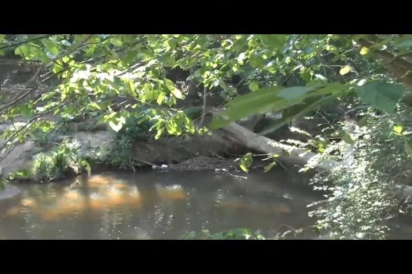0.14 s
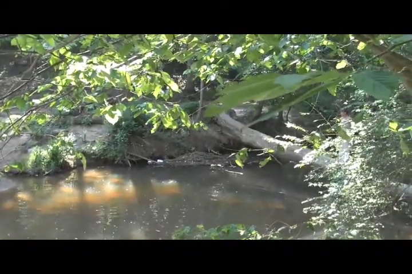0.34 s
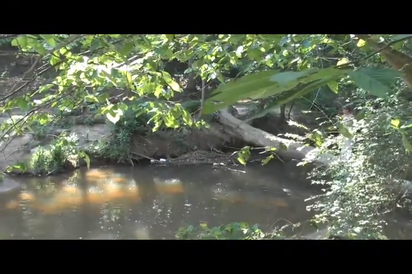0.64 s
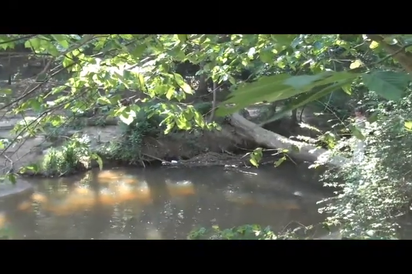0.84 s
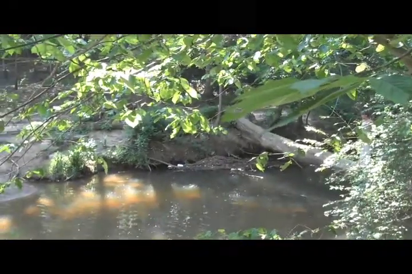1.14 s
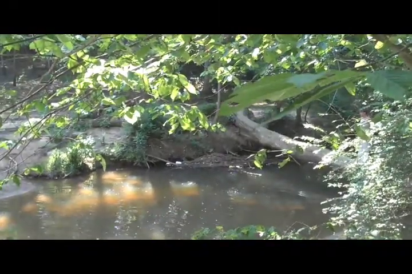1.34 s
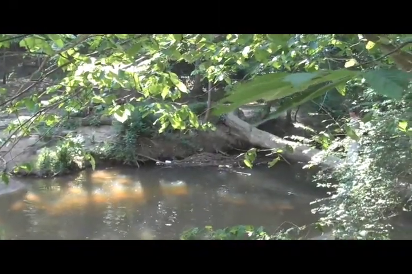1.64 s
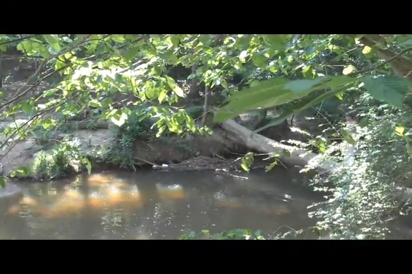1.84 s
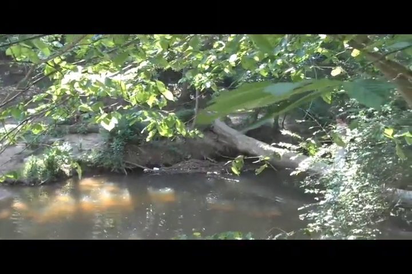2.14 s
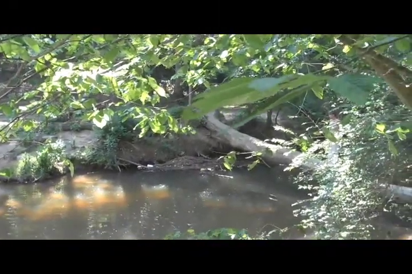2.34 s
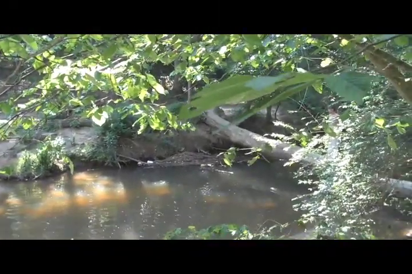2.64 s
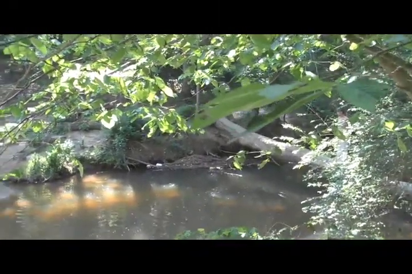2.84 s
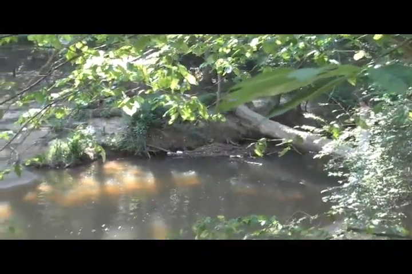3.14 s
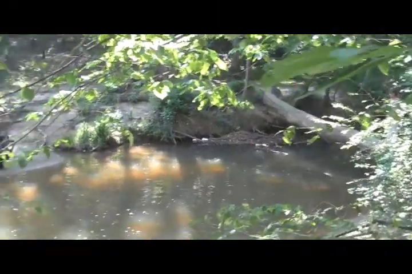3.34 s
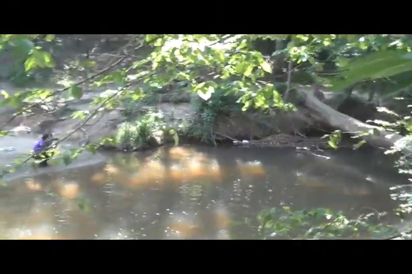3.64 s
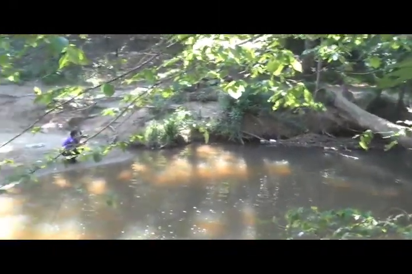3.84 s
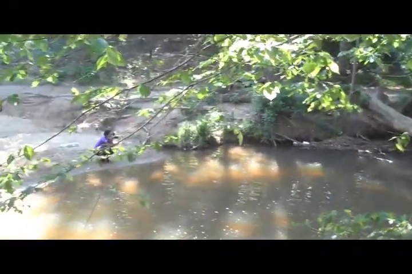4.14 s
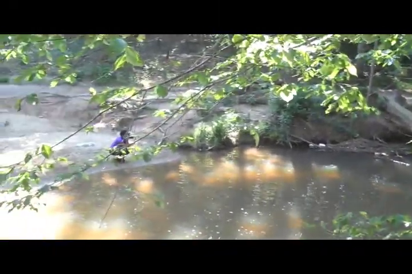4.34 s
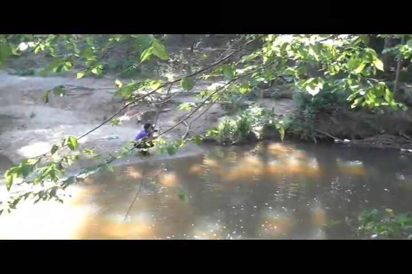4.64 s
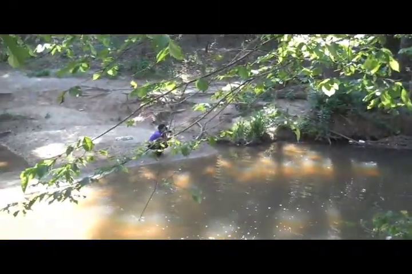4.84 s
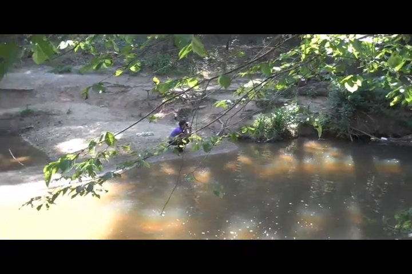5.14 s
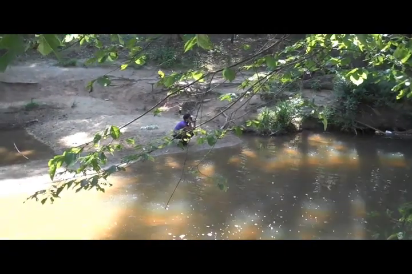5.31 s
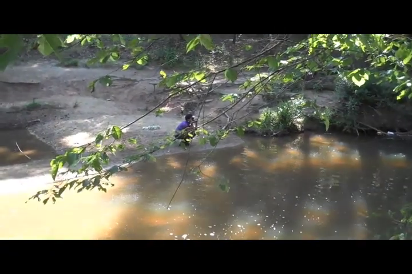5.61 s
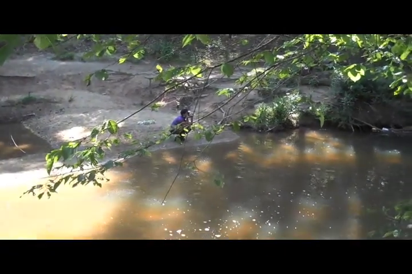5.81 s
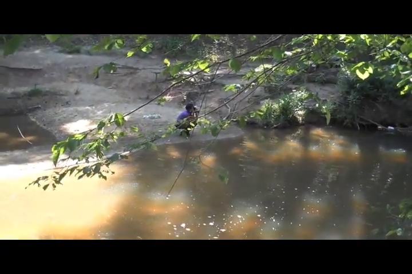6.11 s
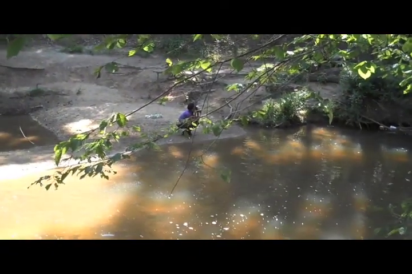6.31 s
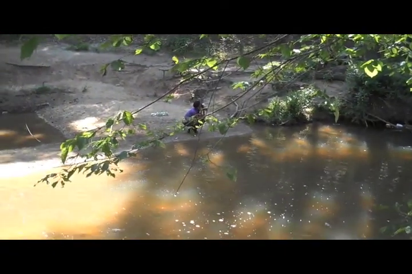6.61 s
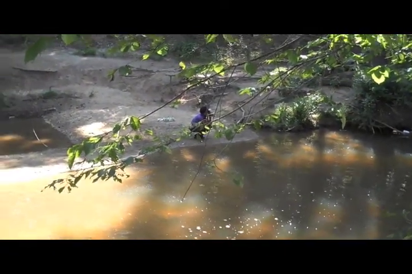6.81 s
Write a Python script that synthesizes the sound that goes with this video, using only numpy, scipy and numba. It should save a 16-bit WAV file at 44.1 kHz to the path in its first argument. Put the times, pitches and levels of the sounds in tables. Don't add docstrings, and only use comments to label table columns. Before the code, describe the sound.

For about seven seconds a creek tumbles over a low weir, heard from some metres away outdoors. The sound is a continuous, dense rush of froth and spray, bright in the middle and upper range, thin in the bass and with the very highest treble cut off. It starts even; a high bubble blip shows near 0.7 s and lower plips around 1 s. The water swells slightly at 1.8 s with a few bubbling notes, then eases back until about 3 s. A high plip comes at 3.3 s, and the rush grows a little towards 3.9 s, with two close, low glugs at 4.0 s. Further small bubbles stand out near 4.6, 5.2, 6.0 and 6.4 s. Another slight rise comes at 5.1 s, followed by a brief dip, and the flow ends a little stronger and brighter, without stopping. The image is nearly mono, with tiny flickers of treble width.

```python
import sys
import numpy as np
from scipy import signal
from scipy.fft import rfft, irfft
from scipy.io import wavfile
from scipy.ndimage import uniform_filter1d
from numba import njit

SR = 44100
rng = np.random.default_rng(int(sys.argv[2]) if len(sys.argv) > 2 else 0)


def voltage_ratio(decibels):
    exponent = np.asarray(decibels, float) / 20
    return 10 ** exponent


def transcribe(u):
    v = np.clip(np.atleast_2d(u).T, -1, 1)
    q = np.round(v * 32767).astype(np.int16)
    wavfile.write(sys.argv[1], SR, q)


N = 307377
FROTH_LOW_HZ, FROTH_TOP_HZ = 200, 8000
FRAME, GRID = 1024, 715


def shaped(x, gain):
    freq_hz = np.arange(len(x) // 2 + 1) * SR / len(x)
    return irfft(rfft(x) * gain(freq_hz), len(x))


def unit(x):
    return x / np.sqrt(np.mean(x ** 2))


def walk(rate_hz):
    hold = int(SR / rate_hz)
    levels = np.repeat(rng.standard_normal(N // hold + 1), hold)
    return 2.0 * uniform_filter1d(uniform_filter1d(levels, hold), hold)[:N]


@njit
def ring(start, hz, cycles, size, glide):
    out = np.zeros(N)
    for k in range(len(hz)):
        span = cycles[k] * SR / hz[k]
        step = np.exp(1j * 2 * np.pi * hz[k] / SR)
        bend = np.exp(1j * 2 * np.pi * hz[k] / SR * glide[k] / span)
        fade, fast = np.exp(-3 / span), np.exp(-9 / span)
        z, body, onset = 1 + 0j, size[k], size[k]
        for i in range(int(start[k]), min(N, int(start[k] + 2 * span))):
            out[i] += (body - onset) * z.imag
            z, step = z * step, step * bend
            body, onset = body * fade, onset * fast
    return out


def in_froth(f):
    return (f > FROTH_LOW_HZ) * (f < FROTH_TOP_HZ)


def froth(count, cycles, scatter_db, glide):
    when, pitch, luck = rng.random((count, 3)).T
    pitch_hz = 150 + 8500 * pitch ** 1.6
    size = voltage_ratio(-scatter_db * np.log(1 - luck))
    cloud = ring(when * N, pitch_hz, cycles * np.ones(count), size, glide * np.ones(count))
    power = uniform_filter1d(np.abs(rfft(cloud)) ** 2, size=1500)
    return unit(shaped(cloud, lambda f: in_froth(f) / np.sqrt(power + 1e-9)))


def weir(bubble_share, surge_db, flicker_db):
    # freq_hz, density_db
    rush_colour = [(20, -31), (35, -32.5), (90, -36), (130, -30), (200, -18.5), (327, -9), (520, -8.5),
                   (749, -2.5), (1160, -1), (2800, -.5), (4500, -3), (7000, -6.5), (9300, -8),
                   (13700, -8.5)]
    # time_s, level_db
    flow_curve = [(0, -38), (.8, -37.7), (1.65, -37.8), (1.85, -36.5), (2.15, -37.5), (2.55, -38),
                  (3.1, -37.5), (3.6, -37), (3.9, -36), (4.15, -36.5), (4.45, -37), (4.9, -36.8),
                  (5.12, -36), (5.3, -37.5), (5.8, -37), (6.2, -36.5), (6.6, -37), (6.97, -36)]
    region_hz = [450, 2000, 5600, 10500]
    swell_share = [.1, 0.78, .5, 0.39]
    turn_db_per_s = [-.05, 0.042, 0.079, 0.13]

    bubbles = np.sqrt(bubble_share) * froth(count=50000, cycles=42.8, scatter_db=1.5, glide=0.051)
    froth_power = bubble_share * SR / 2 / FROTH_TOP_HZ
    spray = shaped(rng.standard_normal(N), lambda f: np.sqrt(1 - froth_power * in_froth(f)))
    colour_hz, colour_db = np.transpose(rush_colour)
    rush = shaped(bubbles + spray, lambda f: voltage_ratio(np.interp(np.log(f + 1), np.log(colour_hz), colour_db)))
    rush = rush / np.std(shaped(rush, lambda f: (f > 900) * (f < 4000)))

    t = np.arange(N) / SR
    flow_db = np.interp(t, *np.transpose(flow_curve))
    mean_db = flow_db.mean()
    surge = surge_db * walk(9.9)
    out = 0
    for own, follow, turn in zip(np.eye(len(swell_share)), swell_share, turn_db_per_s):
        band = shaped(rush, lambda f: np.interp(np.log(f + 1), np.log(region_hz), own))
        swell_db = mean_db + follow * (flow_db - mean_db) + turn * (t - t.mean())
        out = out + band * voltage_ratio(swell_db + surge + flicker_db * walk(18))
    return out


def glugs():
    # start_s, pitch_hz, level_db, length_cycles, glide_share
    pockets = [(.68, 4300, -37, 40, .03), (0.978, 447, -47, 13, 0.11), (1.05, 1560, -37, 34, .05),
               (1.699, 1720, -39, 24, .05), (1.898, 1160, -41, 20, 0.092), (1.952, 1040, -40.5, 44, .05),
               (3.299, 3270, -38, 35, .03), (4.005, 722, -42, 20, .03), (4.025, 736, -38.5, 32, .02),
               (4.6, 1340, -40, 35, .05), (5.17, 2750, -35, 30, .03), (6.04, 633, -46, 21, .05),
               (6.4, 7750, -42, 60, .02)]
    start_s, pitch_hz, level_db, cycles, glide = np.array(pockets, float).T
    return ring(start_s * SR, pitch_hz, cycles, 3.5 * voltage_ratio(level_db), glide)


def scene():
    mono = weir(bubble_share=0.099, surge_db=0.09, flicker_db=0.21) + glugs()
    return np.tile(mono, (2, 1))


def frame_lines(low_hz, high_hz):
    line = np.arange(round(low_hz * 2 * FRAME / SR), round(high_hz * 2 * FRAME / SR))[:, None]
    window = signal.windows.kaiser_bessel_derived(2 * FRAME, 4 * np.pi)
    phase = np.pi / FRAME * (np.arange(2 * FRAME) + .5 + FRAME / 2) * (line + .5)
    return np.sqrt(2 / FRAME) * window * np.cos(phase)


def starve_top(mono, step_db):
    out, lines = mono.copy(), frame_lines(13780, 14300)
    for start in range(GRID, len(mono) - 2 * FRAME, FRAME):
        old = lines @ mono[start:start + 2 * FRAME]
        new = np.round(old / voltage_ratio(step_db)) * voltage_ratio(step_db)
        out[start:start + 2 * FRAME] += (new - old) @ lines
    return out


def widen(mono, patch_db):
    # start_s, then low_hz of each patch
    patches = [(0.109, 4630), (0.55, 5190), (0.759, 9250), (0.782, 5160), (0.852, 8950, 13130),
               (0.875, 4150, 11020, 12610), (0.968, 10600), (1.247, 4150, 8240),
               (1.456, 8260, 10900, 13130), (1.758, 7900, 10900), (1.827, 7580, 10330), (1.967, 5140, 9640),
               (2.524, 9640), (3.081, 4400), (4.312, 4650), (4.474, 4630), (4.591, 8260),
               (5.566, 5680, 10300), (5.612, 5680), (5.752, 4400, 6280), (5.937, 5660), (6.378, 4150, 6890),
               (6.611, 4200, 5240, 10950), (6.936, 4120)]
    out = np.tile(mono, (2, 1))
    for start_s, *edges_hz in patches:
        start = GRID + FRAME * round((start_s * SR - GRID) / FRAME + 1)
        for low_hz in edges_hz:
            lines = frame_lines(low_hz, min(low_hz * 1.08 + 700, 13780))
            old = lines @ mono[start:start + 2 * FRAME]
            new = voltage_ratio(patch_db) * np.std(old) * rng.standard_normal((2, len(old)))
            out[:, start:start + 2 * FRAME] += (new - old) @ lines
    return out


def preamp_drift():
    # start_s, size_fs
    jumps = [
        (1.666, .00055),
        (4.258, -.0007),
    ]
    offset, settle_s = -0.00038, .12
    t = np.arange(N) / SR
    return offset + sum(size * (t > s) * np.exp(-np.abs(t - s) / settle_s) for s, size in jumps)


def low_pass(x):
    return signal.sosfilt(signal.butter(12, 15120, fs=SR, output="sos"), x)


def record(dry):
    mono = shaped(dry[0], lambda f: f < 13945) + preamp_drift()
    padded = np.pad(mono, 2 * FRAME, mode="reflect")
    edged = starve_top(padded, step_db=-25.5)
    wide = widen(edged, patch_db=-.5)
    return low_pass(wide[:, 2 * FRAME:-2 * FRAME])


dry = scene()
out = record(dry)
transcribe(out)
```